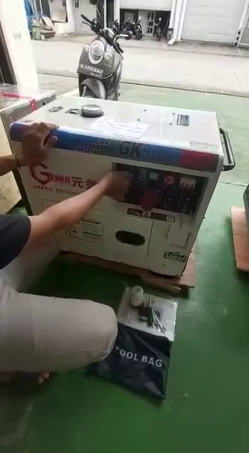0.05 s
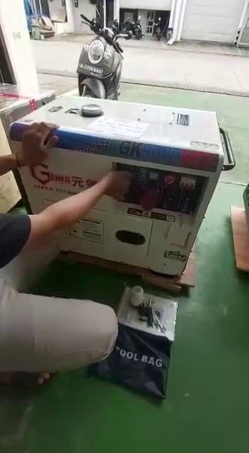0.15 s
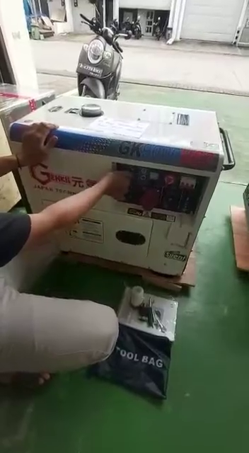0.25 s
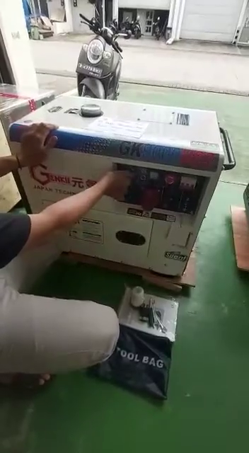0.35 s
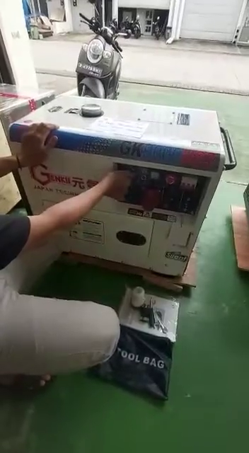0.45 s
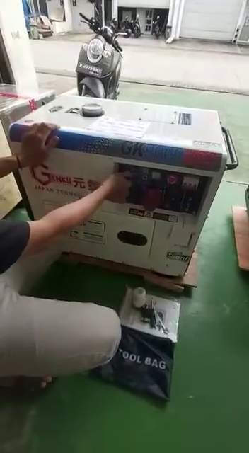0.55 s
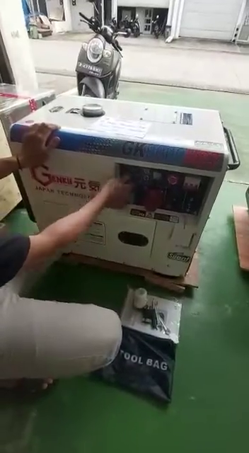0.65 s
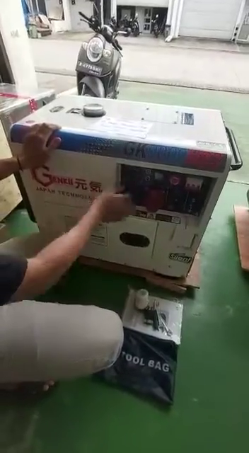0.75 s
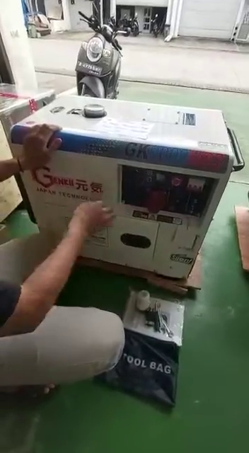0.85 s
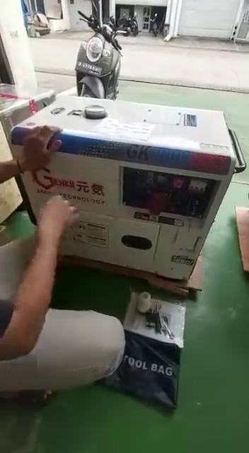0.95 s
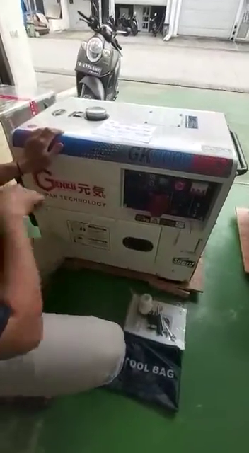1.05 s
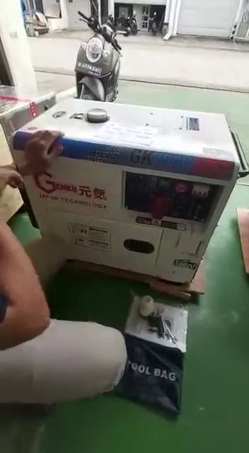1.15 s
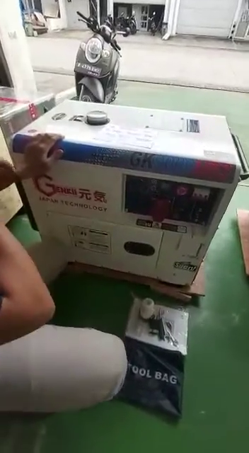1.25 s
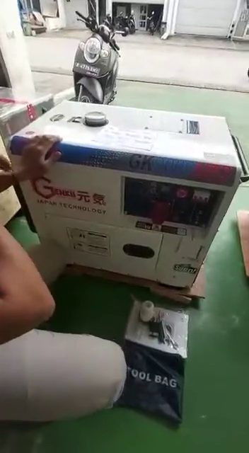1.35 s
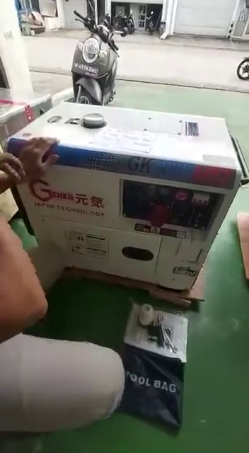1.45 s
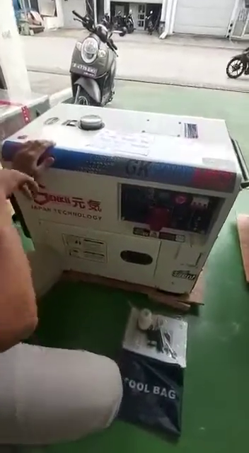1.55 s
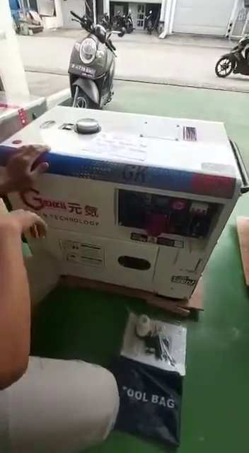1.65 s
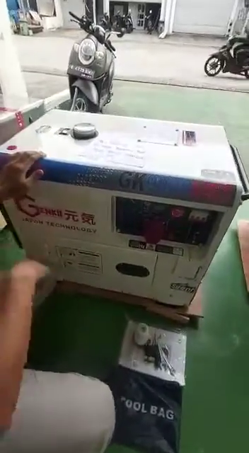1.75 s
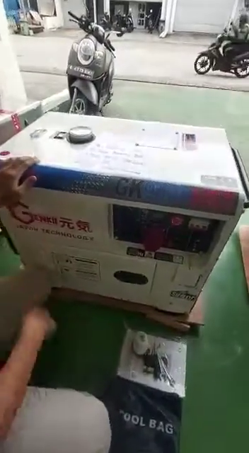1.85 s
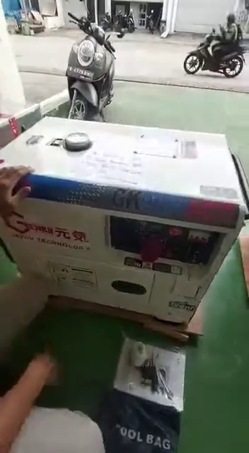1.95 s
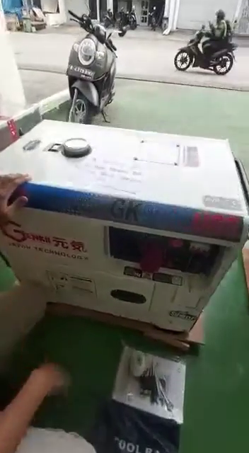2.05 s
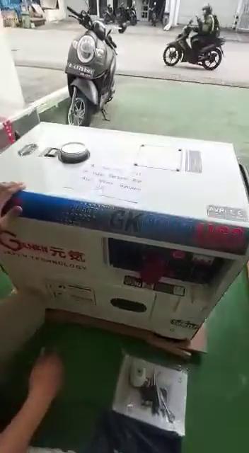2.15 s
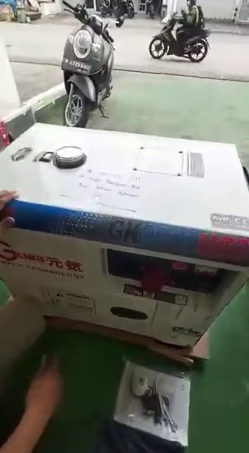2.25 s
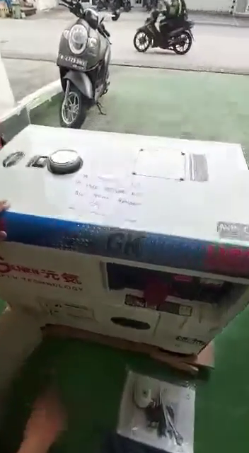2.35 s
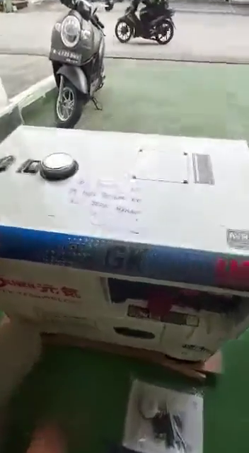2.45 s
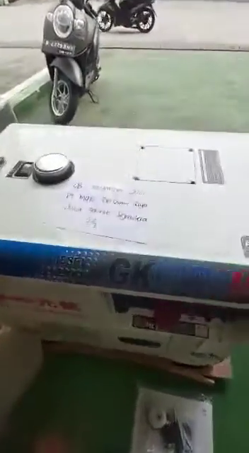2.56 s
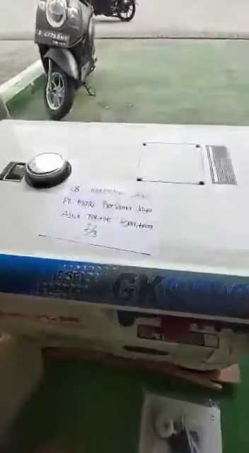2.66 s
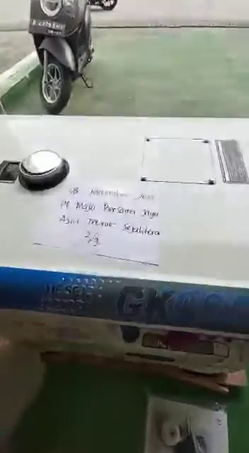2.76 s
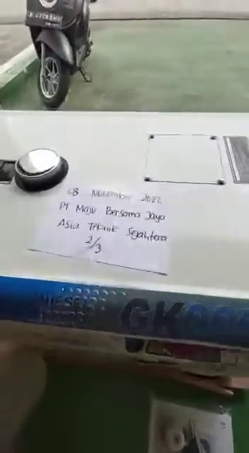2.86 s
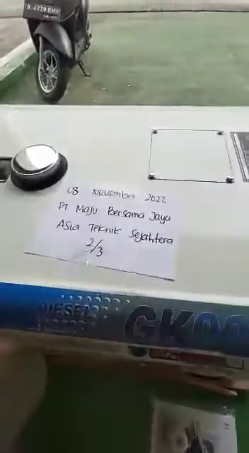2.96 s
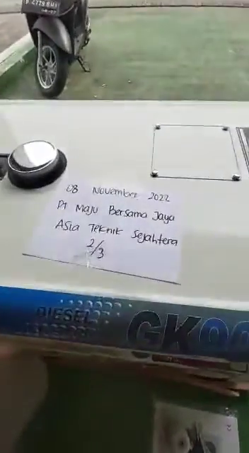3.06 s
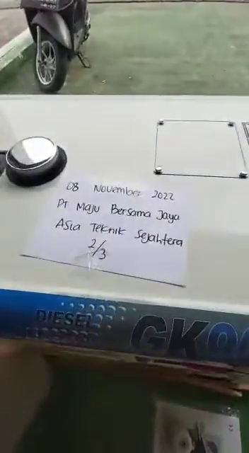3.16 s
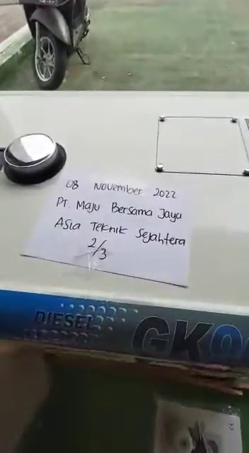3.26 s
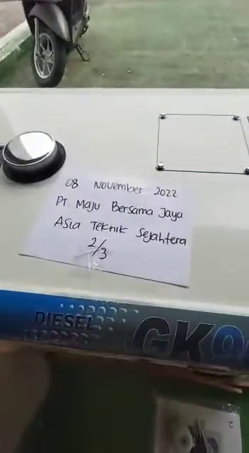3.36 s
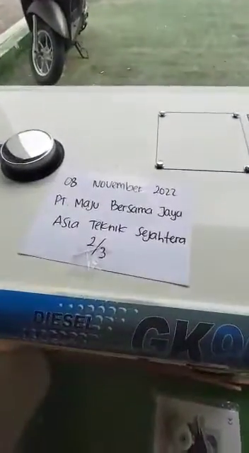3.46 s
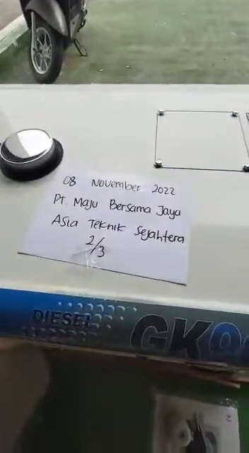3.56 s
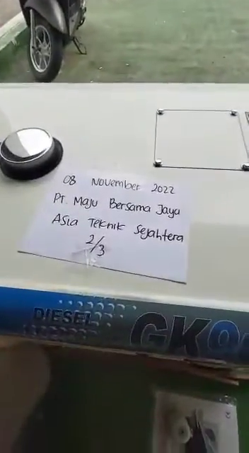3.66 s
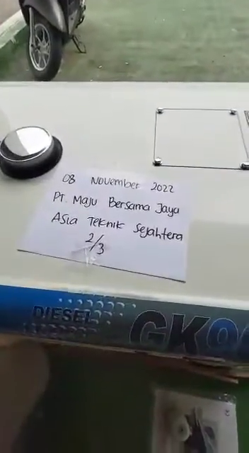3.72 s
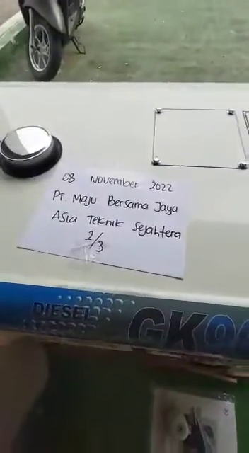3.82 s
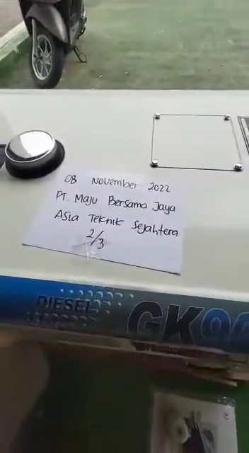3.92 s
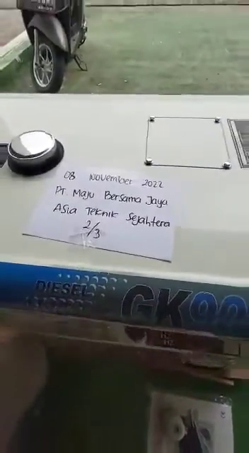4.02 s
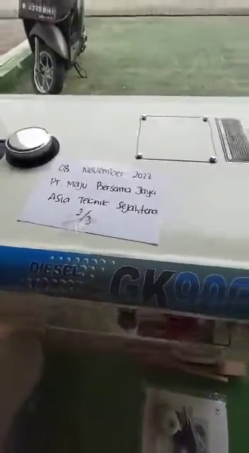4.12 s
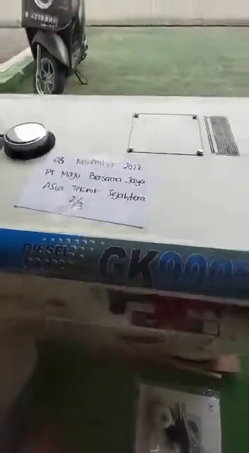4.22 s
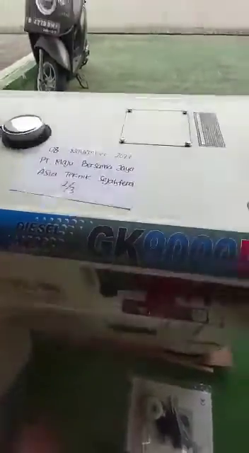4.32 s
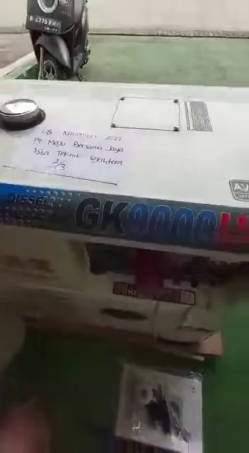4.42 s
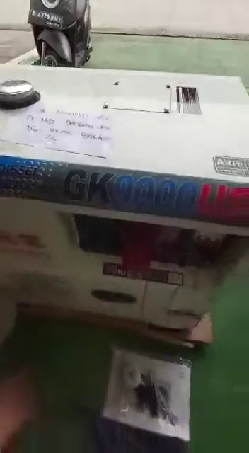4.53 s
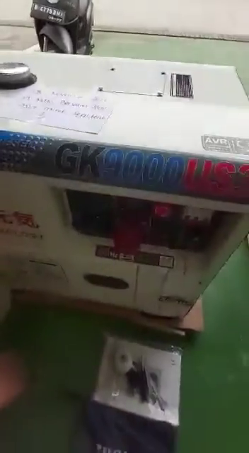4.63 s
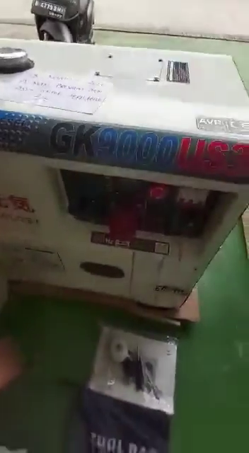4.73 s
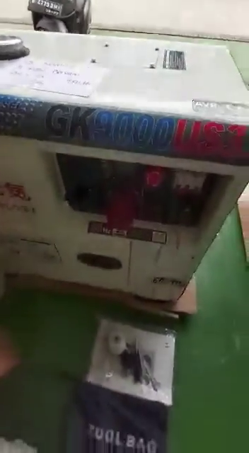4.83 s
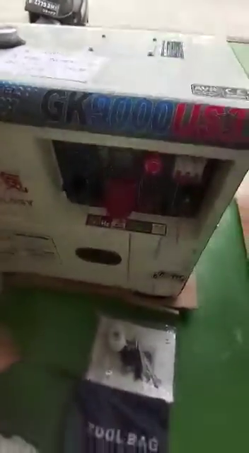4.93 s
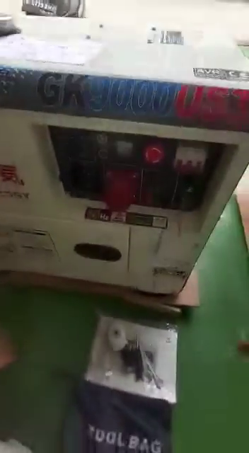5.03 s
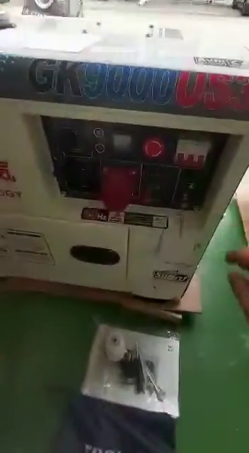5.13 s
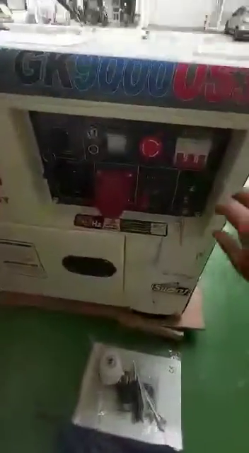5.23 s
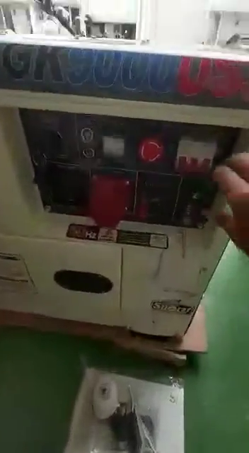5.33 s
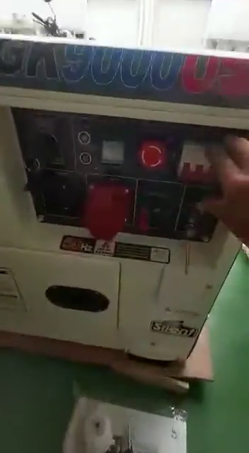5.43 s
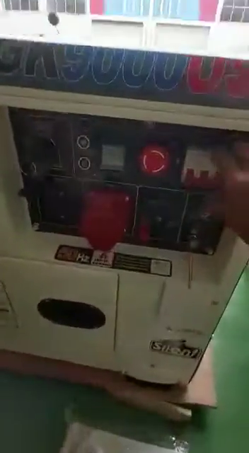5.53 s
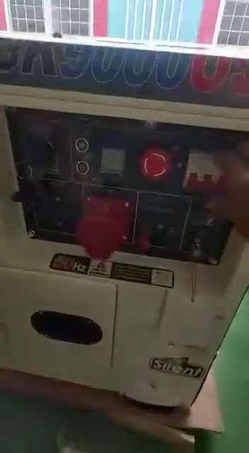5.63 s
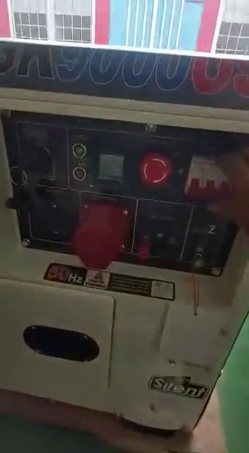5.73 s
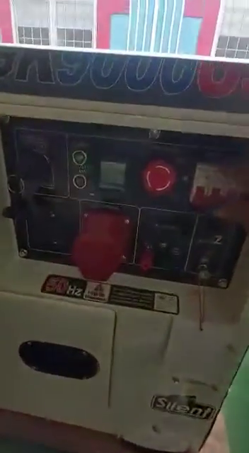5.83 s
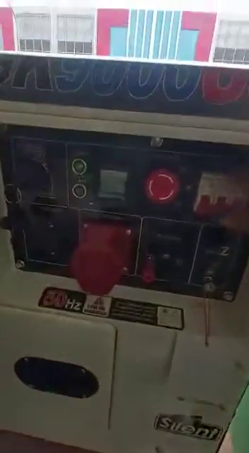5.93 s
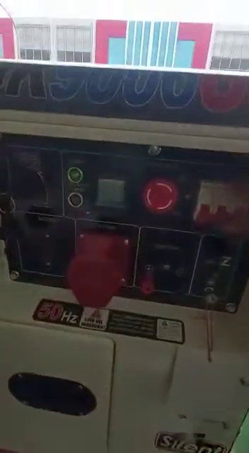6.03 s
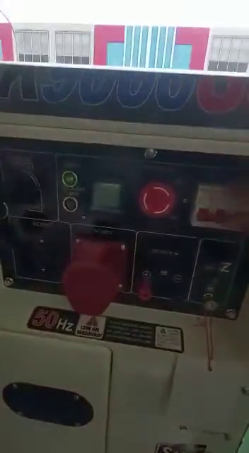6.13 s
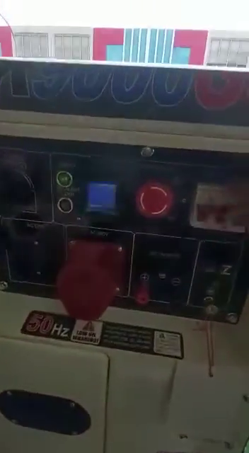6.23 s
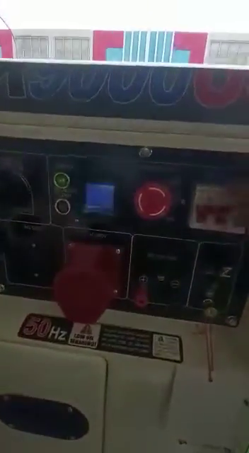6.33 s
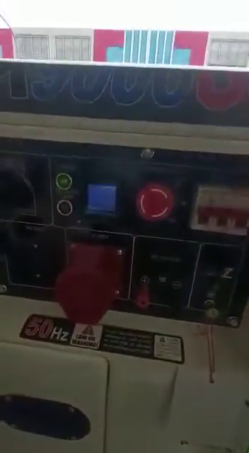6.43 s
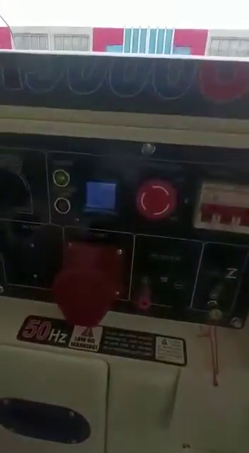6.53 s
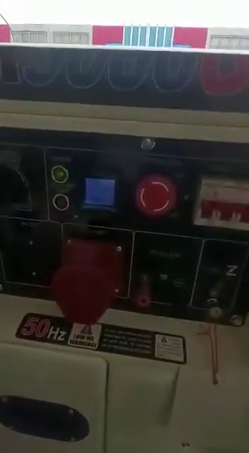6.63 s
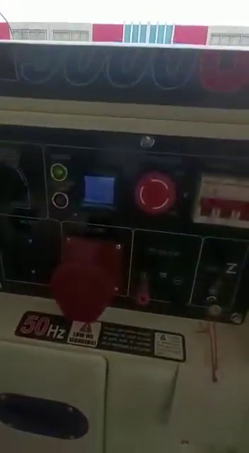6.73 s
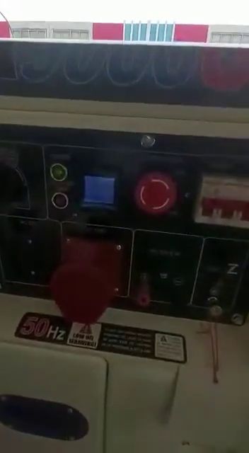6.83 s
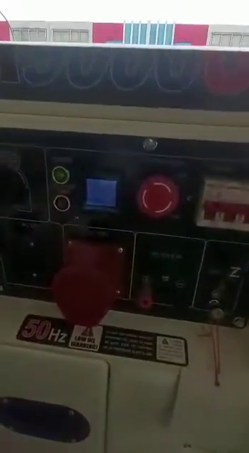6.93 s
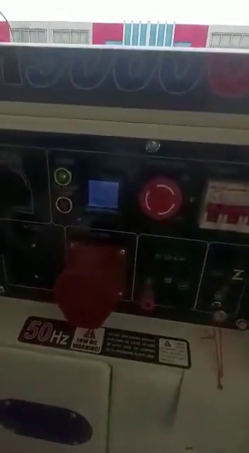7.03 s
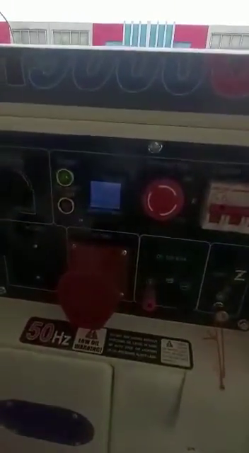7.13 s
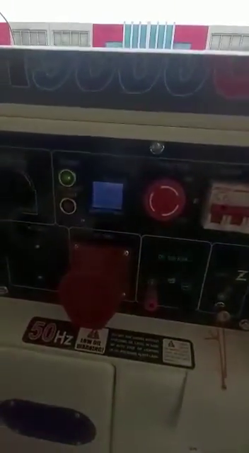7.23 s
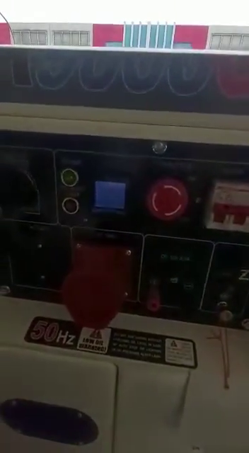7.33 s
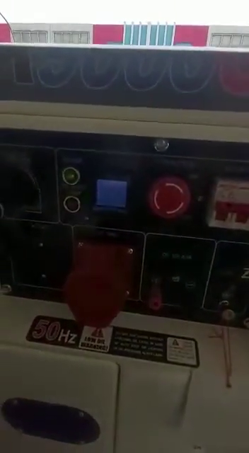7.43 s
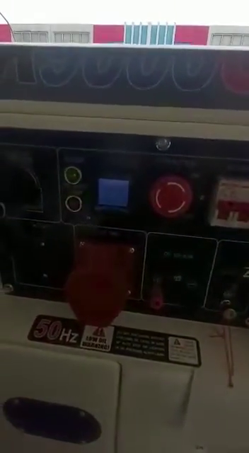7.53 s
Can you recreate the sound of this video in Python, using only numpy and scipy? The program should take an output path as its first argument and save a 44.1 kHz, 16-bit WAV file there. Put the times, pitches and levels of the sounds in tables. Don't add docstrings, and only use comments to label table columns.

```python
import sys
import numpy as np
from scipy import signal
from scipy.fft import rfft, irfft
from scipy.io import wavfile
from scipy.ndimage import uniform_filter1d

SR = 44100
rng = np.random.default_rng(int(sys.argv[2]) if len(sys.argv) > 2 else 0)


def nominal_scale(level):
    x = np.asarray(level, float) / 20
    return 10 ** x


def bounce(signal):
    frames = np.transpose(np.atleast_2d(signal))
    limited = np.clip(frames, -1, 1)
    pcm = np.round(limited * 32767).astype(np.int16)
    wavfile.write(sys.argv[1], SR, pcm)


N = 334278
T = np.arange(N) / SR
RUN_HZ = 26.2
MAX_CYCLES = 256

# start_s, place (0 beside, 1 over the lid, 2 at the panel)
PHONE_PLACE = [
    (0, 0),
    (1.6, 0),
    (2.5, 1),
    (4.4, 1),
    (5.2, 1.3),
    (5.45, 1.8),
    (6.1, 2),
    (7.58, 2),
]


def level(x, db):
    return x * nominal_scale(db) / np.sqrt(np.mean(x ** 2))


def even(x):
    return x / np.sqrt(uniform_filter1d(np.mean(x ** 2, axis=0), size=12000) + 1e-18)


def curves(table):
    s, *columns = np.transpose(table)
    return [np.interp(T, s, c) for c in columns]


def stage(values, fuel, place):
    governed = np.interp(place, (0, 1, 2), values[1:])
    return fuel * values[0] + (1 - fuel) * governed


def walk(rate):
    hold = int(SR / rate)
    steps = np.repeat(rng.standard_normal(N // hold + 1), hold)
    return 1.3 * uniform_filter1d(uniform_filter1d(steps, hold), hold)[:N]


def pair(alike, size=N):
    a, b = rng.standard_normal((2, size))
    alike = np.clip(alike, 0, 1)
    return np.array([alike * a + np.sqrt(1 - alike ** 2) * b, a])


def colour(x, points):
    hz, db = np.transpose(points)
    grid = np.fft.rfftfreq(4096, d=1 / SR)
    curve_db = np.interp(np.log(grid + 1), np.log(np.maximum(hz, 1)), db)
    ceps = irfft(np.log(nominal_scale(curve_db)))
    ceps[1:2048] *= 2
    ceps[2049:] = 0
    impulse = irfft(np.exp(rfft(ceps)))
    return signal.oaconvolve(x, impulse[None], axes=1)[:, :N]


def ring(x, hz, width):
    return signal.lfilter(*signal.iirpeak(hz, hz / width, fs=SR), x) / np.sqrt(width)


def crank(angle):
    cycle = np.floor(angle).astype(int) + 1
    begins = np.diff(cycle, prepend=cycle[0]) > 0
    start = np.maximum.accumulate(np.where(begins, np.arange(N), 0))
    return cycle, angle % 1, np.arange(N) - start


def knock(angle, rest_db, decay, valve_db, scatter_db):
    # cycles after firing, level_db
    valve_blows = [
        (0.157, -3),
        (0.36, 3.5),
        (0.559, -1),
        (.72, -13.5),
    ]
    cycle, part, since = crank(angle)
    size = nominal_scale(scatter_db * rng.standard_normal((MAX_CYCLES, 5)))[cycle].T
    attack = 1 - np.exp(-since / 30)
    shake = size[0] * np.exp(-part / decay) * attack
    for (at, db), gain in zip(valve_blows, size[1:]):
        fade = np.exp(-np.maximum(part - at, 0) / 0.05)
        shake += gain * nominal_scale(db + valve_db) * (part > at) * fade
    shake += nominal_scale(rest_db)
    return shake / np.sqrt(uniform_filter1d(shake ** 2, size=8000)), since


def blows(angle, speed):
    # pitch_hz, width_hz, crest in cycles after the stroke, level_db
    struck_walls = [
        [(322, 70, .3, -34.5), (608, 54.9, 0.0804, -28), (601.6, 28.3, .42, -27.5), (854, 59.7, .05, -25.5),
         (869, 24, .3, -30.5), (1315, 130.3, .03, -32), (1080, 150, .03, -39), (2464, 250, .01, -43),
         (1900, 300, .01, -42), (3400, 250, .01, -52)],
        [(562, 60, .05, -33.5), (660, 60, .35, -39), (850, 59.3, .08, -34), (750, 60, .1, -39.5),
         (1300, 108.6, -.08, -42.5), (1240, 120, 0.62, -39.5)],
        [(470, 80, .68, -43), (448, 86.4, .37, -45), (623, 55, -0.073, -38), (603.2, 10, .1, -33.5),
         (554, 14, .1, -40), (823.4, 60.6, .1, -34.5), (1339, 100, -0.19, -39.5), (1222, 120, .3, -41),
         (2100, 300, -.04, -55.5), (4450, 90, -.1, -55)],
        [(451, 60, -.2, -39.5), (605, 12, .2, -35), (650.7, 14, .2, -36.5), (613.5, 70, 0.27, -37),
         (853, 70, .2, -36.5), (1333, 90.4, .02, -35.5), (1045, 120, .1, -45), (1238, 140, -0.17, -40),
         (2300, 300, -0.17, -55)],
        [(613.4, 60, .27, -40.5), (649, 14, .3, -43.5), (589, 83, -.15, -39.5), (786, 72, .05, -39),
         (875, 72.4, .47, -43), (1048, 110, .3, -41.5), (1236, 91.9, .02, -40), (1327, 134, -.11, -42.5),
         (2300, 220, -.08, -54.5), (3350, 200, -.14, -54.5), (4000, 220, -.14, -50)],
    ]
    # start_s, facing (index into the tables above)
    wall_facing = [(0, -0.5), (1.58, 0.5), (1.72, 1), (2.2, 1.5), (2.6, 2), (4.1, 2.5), (4.5, 3.5),
                   (5.15, 3), (5.4, 3.5), (5.85, 3), (6.1, 4), (7.58, 3.5)]
    scatter_db, wander_db, jitter_s = 1.34, 1.5, .00008
    spread_turns = .17
    slow_blow_law = 0.78

    facing, cycles, out = curves(wall_facing)[0], np.arange(MAX_CYCLES), 0
    for view, walls in enumerate(struck_walls):
        share = np.clip(1 - abs(facing - view), 0, 1)
        for hz, width, crest, db in walls:
            chance = rng.standard_normal((5, MAX_CYCLES))
            stroke_s = np.interp(cycles - 1 + crest, angle, T, left=-1, right=-1)
            hit_s = stroke_s - .26 / width + jitter_s * chance[0]
            wander = wander_db * 3 * uniform_filter1d(chance[4], size=9)
            size = nominal_scale(scatter_db * (chance[1] + chance[2:4]) + wander)
            left_late_s = spread_turns / hz * np.tanh(2 * chance[0, 0])
            hits = np.zeros((2, N))
            for port, late_s in enumerate((left_late_s, 0)):
                at = (hit_s + late_s) * SR
                i = np.clip(at.astype(int), 0, N - 2)
                gain = size[port] * share[i] * (at > 0) * (RUN_HZ / speed[i]) ** slow_blow_law
                hits[port, i] = gain * (1 - at % 1)
                hits[port, i + 1] = gain * (at % 1)
            wall = ring(ring(hits, hz, width), hz, 1.5 * width)
            out = out + level(wall, db) * np.sqrt(np.mean(share ** 2))
    return out


def panels(x, modes, lag):
    skirt = 3.36
    place = curves(PHONE_PLACE)[0]
    out = 0
    for k, (hz, width, *db) in enumerate(modes):
        gain = nominal_scale(np.interp(place, (0, 1, 2), db) + 1.2 * walk(2))
        tone = even(ring(ring(x, hz, width), hz, skirt * width))
        out = out + (-1) ** k * gain * np.roll(tone, int(lag * SR / hz), axis=1)
    return level(out, 0)


def casing(angle, rest_db):
    # pitch_hz, width_hz, beside_db, lid_db, panel_db
    casing_modes = [(443.3, 100, -16, -16.5, 5), (542, 180, 3.5, 0, 1.5), (594, 90, -2, -10, -21.5),
                    (682, 58, -26, -16.5, -5), (775, 7, -19.5, -6, -5.5), (833, 130, 1, 4, -1),
                    (1056, 29, -13, -8.5, -16.5), (1173.6, 78, -6.5, -9, -8.5),
                    (1304, 130, -7.5, -11.5, -11), (1331, 29, -12, -19.5, -32)]
    lag_cycles = 3.043
    drift = .5 * walk(0.45)
    boom, since = knock(angle, rest_db - 6, decay=.14, valve_db=-5, scatter_db=2)
    habit = np.cos(drift) * pair(1.0, size=8192)[:, since]
    habit = habit + np.sin(drift) * pair(1.0, size=8192)[:, since]
    strike = 2.5 * np.exp(-since / 8) * (since > 0)
    rattle = habit + strike + .35 * pair(.65)
    rap, _ = knock(angle, rest_db - 9, decay=.1, valve_db=-13, scatter_db=2.5)
    large = panels(boom * rattle, casing_modes[:6], lag_cycles)
    small = panels(rap * rattle, casing_modes[6:], lag_cycles)
    return level(large + nominal_scale(-4.0) * small, 0)


def hiss(angle, rest_db):
    # pitch_hz, level_db
    air_curve = [(1100, -0.5), (1500, 5.5), (2500, 2), (3500, -3), (5000, -5.5), (7300, -11), (8200, -22),
                 (9500, -79.5)]
    # pitch_hz, width_hz, beside_db, lid_db, panel_db
    block_modes = [(2040, 460, 8.5, 13, 13), (2443, 120, 10, 6, 9.5), (3350, 110, 4.5, -1.5, 10),
                   (4013, 160, 2.5, -1.5, 9), (4430, 59, -12, 7, -35), (6270, 330, -24.5, -16.5, 0.5),
                   (6300, 2100, 8.5, -10.5, -18), (7670, 660, 0, -31, -14)]
    shake, _ = knock(angle, rest_db + 2.5, decay=0.57, valve_db=-13.0, scatter_db=1.0)
    tick, _ = knock(angle, rest_db - 6, decay=.12, valve_db=-12, scatter_db=2)
    air = level(colour(shake * pair(0.11), air_curve), 0)
    return level(air + nominal_scale(-5.0) * panels(tick * pair(0.18), block_modes, 0), 0)


def injector(angle, rest_db, fuel):
    # pitch_hz, level_db
    tick_curve = [(6500, -24), (8000, 1), (10000, -2), (12500, -0.5), (15500, -5.5), (15900, -48.5)]
    # pitch_hz, width_hz, level_db
    metal_rings = [(9400, 90, 2), (11600, 250, -8), (13200, 150, 3), (15400, 140, -5)]
    shake, _ = knock(angle, rest_db + 5.0, decay=0.11, valve_db=-1.5, scatter_db=5.0)
    spray = level(colour(shake * pair(0.23), tick_curve), 0)
    tap, _ = knock(angle, rest_db - 6.5, decay=0.15, valve_db=-6.5, scatter_db=2.5)
    tap = tap * pair(0.23)
    rings = sum(nominal_scale(db + 2 * walk(4)) * ring(tap, hz, width) for hz, width, db in metal_rings)
    return spray + (.2 + .8 * fuel) * level(rings, -6)


def drone(angle, speed, fuel, place):
    # multiple of firing rate, full_in_hz (firings per second), full_fuel_db, lid_db, panel_db
    main_multiples = [
        (3, 23.8, -20.5, -23, -21),
        (4, 23.2, -15, -13, -12.5),
        (6, 25, -22, -28.5, -31.5),
        (7, 14.6, -20.5, -28, -34),
    ]
    # multiple of firing rate, lid_db, panel_db
    faint_multiples = [(2, -39, -20.5), (5, -19.5, -30), (8, -37, -20.5), (9, -26.5, -26.5),
                       (10, -31, -39.5), (11, -31.5, -19.5), (12, -19.5, -22.5), (13, -20.5, -21),
                       (14, -35.5, -27.5), (15, -28, -36.5), (16, -39, -16.5), (17, -39, -25),
                       (18, -35.5, -24.5), (19, -38, -29), (21, -49.5, -20.5)]
    panel_share = (0.62, 0.12, 0.69)
    crest_lead, puff_lead, valve_lag = .2, .25, .4
    join_db_per_hz = 2.5

    def wave(turns):
        return np.cos(2 * np.pi * turns) * np.sqrt(2)

    def early(k):
        return wave(k * angle + crest_lead * (k - 7 / 2))

    def middle(k):
        return wave(k * angle + puff_lead * (k - 41 / 8))

    def late(k):
        return wave(k * (angle - valve_lag) + 1 / 5)

    levels = [stage((full, lid, lid, panel), fuel, place) - join_db_per_hz * np.maximum(hz - speed, 0)
              for _, hz, full, lid, panel in main_multiples]
    waves = early(3), early(4), middle(6), middle(7)
    out = sum(nominal_scale(db + .5 * walk(5)) * tone for db, tone in zip(levels, waves))
    mix = np.clip(np.interp(place, (0, 1, 2), panel_share), 0, 1)
    for k, lid_db, panel_db in faint_multiples:
        tone = early(k) if k < 5 else middle(k) if k < 7 else late(k)
        db = levels[1] + lid_db + mix * (panel_db - lid_db)
        out += nominal_scale(db + 0.7 * walk(3)) * tone
    return out


def thump(angle):
    # pitch_hz, width_hz, level_db
    pipe_modes = [(103.5, 34, -2), (172, 270, -6), (320, 69, -10)]
    cycle, _, since = crank(angle - .55)
    size = nominal_scale(0.5 * rng.standard_normal(MAX_CYCLES))[cycle]
    kick = size * (since == 1) + 0.036 * pair(1.0)
    return even(sum((-1) ** k * nominal_scale(db) * ring(ring(kick, hz, width), hz, hz / 4)
                    for k, (hz, width, db) in enumerate(pipe_modes)))


def starter(angle, speed, fuel):
    hum_hz, drag_from_hz, drag_hz_per_hz = 224, 11, 1.6
    start_db, fade_db_s, cut_db = -22.5, 7.5, -57.5
    stall_s, stall_width_s, stall_db = 0.076, 0.12, -17
    hz = hum_hz + drag_hz_per_hz * np.maximum(speed - drag_from_hz, 0)
    hz = hz * (1 + .012 * walk(30))
    db = start_db - fade_db_s * T + cut_db * (1 - fuel)
    db += stall_db * np.exp(-((T - stall_s) / stall_width_s) ** 2)
    sag_db = 4 * np.cos(2 * np.pi * (angle - .45))
    hum = np.sqrt(2) * np.sin(2 * np.pi * np.cumsum(hz) / SR)
    return nominal_scale(db + sag_db + 1.3 * walk(25)) * hum


def clicks():
    # start_s, level_db, decay_s
    snaps = [
        (6.211, -18.5, 0.0018),
        (7.5785, -29.5, 0.00059),
    ]
    plastic = [(500, -14.0), (2000, -2.0), (4700, 7.0), (7000, -4.5), (10000, -16.0), (15500, -15)]  # Hz, dB
    shape = sum(nominal_scale(db) * (T > s) * np.exp(-np.maximum(T - s, 0) / decay) for s, db, decay in snaps)
    return shape * colour(pair(0.42), plastic)


def rumble(casing_db):
    # pitch_hz, level_db
    roar_curve = [(25, -10.5), (50, 3), (100, 3), (200, 4), (400, 2.5), (900, 3), (1500, -20.5),
                  (2500, -59.5)]
    return level(colour(pair(0.67), roar_curve), -2.2) * nominal_scale(casing_db + 1.8 * walk(6))


def shade(x):
    # pitch_hz, level_db
    hand_curve = [(60, 1), (110, -5.5), (200, 11.5), (380, 2.5), (800, 0), (2380, -4.5), (4400, -9.0),
                  (9000, -24.5)]
    x[0] = np.roll(colour(x[:1], hand_curve)[0], 2)
    return x


def scene():
    # start_s, firings per second
    engine_speed = [(0, 9.486), (.2, 8.492), (.4, 11.109), (.65, 14.066), (1.1, 19.883), (1.55, 25.307),
                    (1.7, 26.149), (1.85, 26.47), (2.05, 26.36), (4.3, 26.185), (5.3, 26.217),
                    (6.4, 26.165), (7.58, 26.24)]
    # start_s, knock_db, exhaust_db
    cold_effort = [(0, 0, 4.5), (.08, -4.5, -2.5), (.15, 0.5, 0.5), (.23, -1, 3.5), (.32, -1.5, -5.5),
                   (.41, -1, -2), (.55, -1.5, -0.5), (.7, -2.5, -1.5), (.82, -2.5, 1.5), (.95, -0.5, -0.5),
                   (1.1, -0.5, -1.5), (1.3, 0, -12), (1.6, 0.5, -4)]
    # beside_db, lid_db, panel_db
    casing_levels = (-26, -33, -36.5, -35)
    hiss_levels = (-38.5, -46.5, -48, -46.5)
    injector_levels = (-49.5, -60.5, -62, -60.5)
    thump_levels = (-20, -57, -63.5, -35)
    rattle_levels = (-6, 5.5, 4.5, -1.5)
    injection_lead = (.11, .18, .2, .22)
    lead_law = .6
    governor_s, cut_s = 1.6, 0.17

    speed, place = curves(engine_speed)[0], curves(PHONE_PLACE)[0]
    angle = -.138 + np.cumsum(speed) / SR
    fuel = np.clip(1 - (T - governor_s) / cut_s, 0, 1)
    knock_db, exhaust_db = curves(cold_effort) * fuel
    casing_db = stage(casing_levels, fuel, place) + knock_db
    rest_db = stage(rattle_levels, fuel, place)
    fired = angle + stage(injection_lead, fuel, place) * (speed / RUN_HZ) ** lead_law

    bright = nominal_scale(knock_db) * blows(angle, speed)
    bright += nominal_scale(casing_db) * casing(fired, rest_db)
    bright += nominal_scale(stage(hiss_levels, fuel, place) + knock_db + 9.5) * hiss(fired, rest_db)
    bright += nominal_scale(stage(injector_levels, fuel, place) + knock_db) * injector(fired, rest_db, fuel)
    bright += clicks()
    bright += rumble(casing_db)
    bright = shade(bright)

    low = drone(angle, speed, fuel, place) + starter(angle, speed, fuel)
    low = low + nominal_scale(stage(thump_levels, fuel, place) + exhaust_db) * thump(angle)
    return bright + low * nominal_scale(np.array([[-.45], [.45]]))


def low_pass(x):
    return signal.sosfilt(signal.butter(12, 15840, fs=SR, output="sos"), x)


def record(dry):
    rounded = np.tanh(0.61 * dry) / 0.47
    return low_pass(rounded)


dry = scene()
out = record(dry)
bounce(out)
```